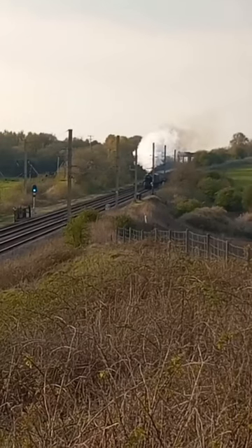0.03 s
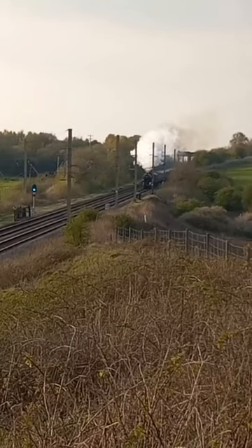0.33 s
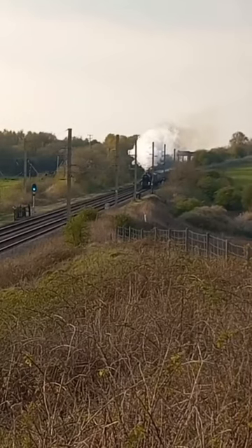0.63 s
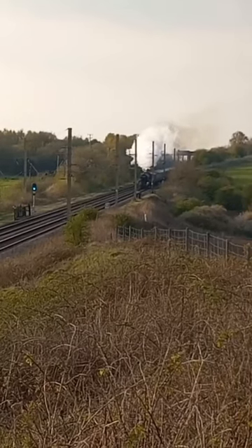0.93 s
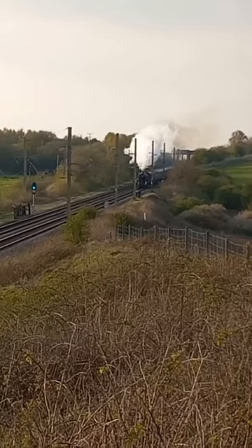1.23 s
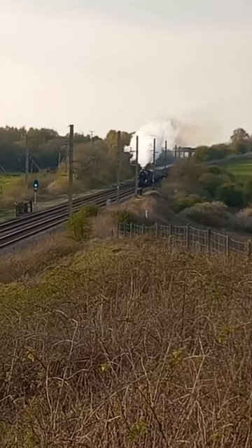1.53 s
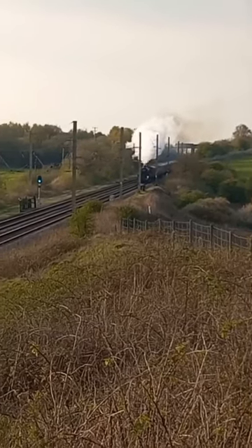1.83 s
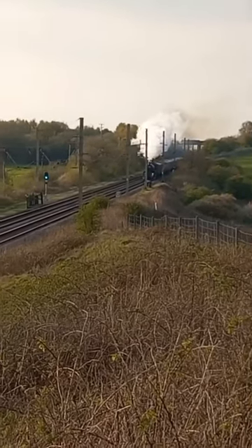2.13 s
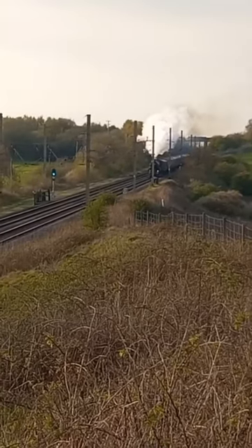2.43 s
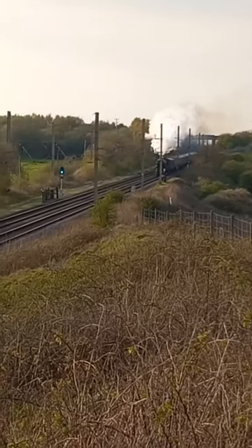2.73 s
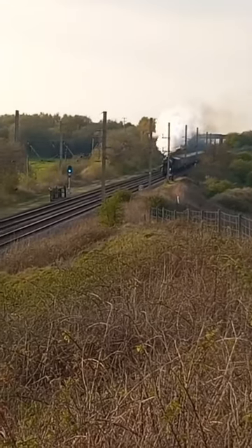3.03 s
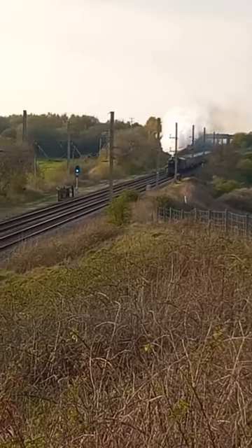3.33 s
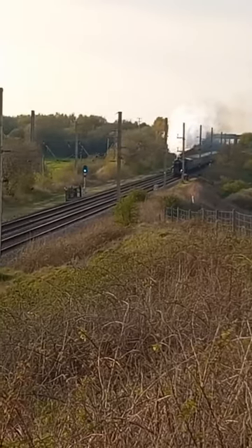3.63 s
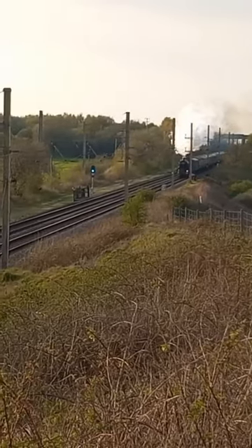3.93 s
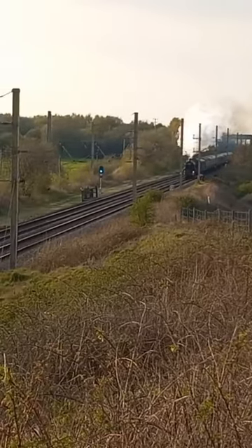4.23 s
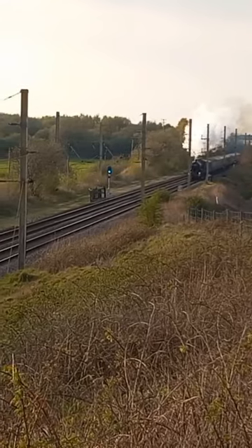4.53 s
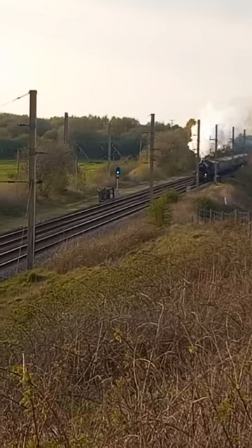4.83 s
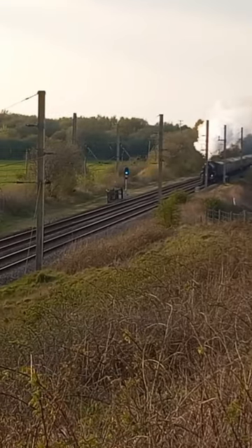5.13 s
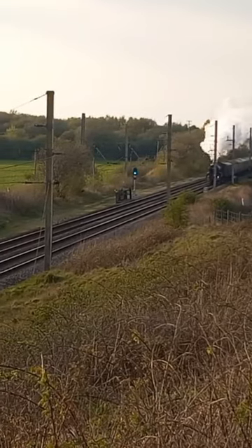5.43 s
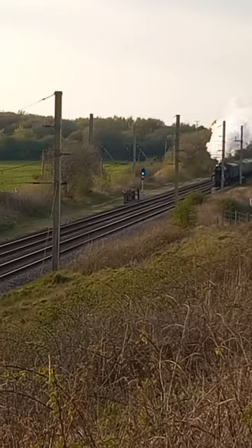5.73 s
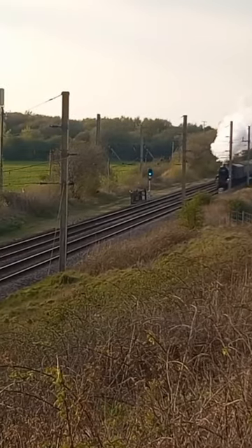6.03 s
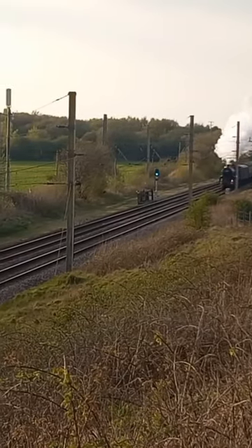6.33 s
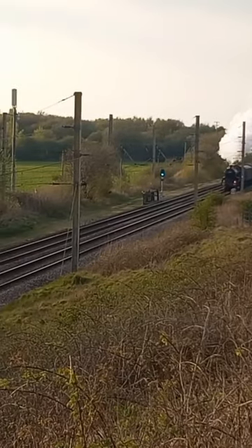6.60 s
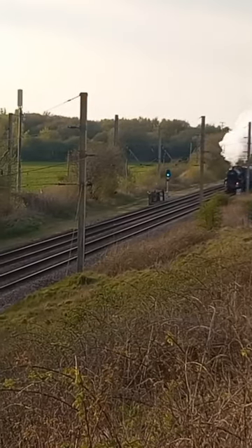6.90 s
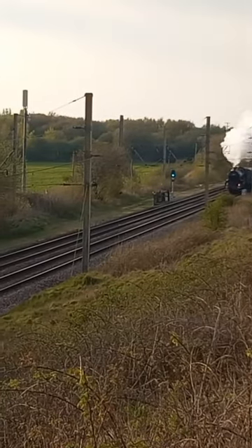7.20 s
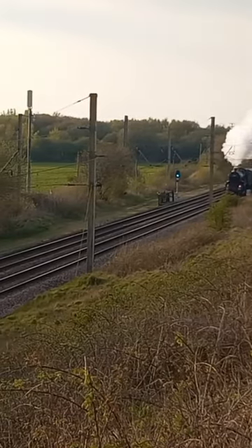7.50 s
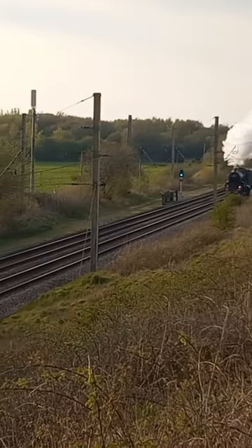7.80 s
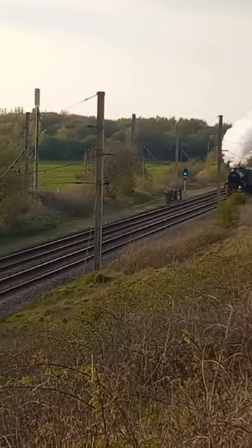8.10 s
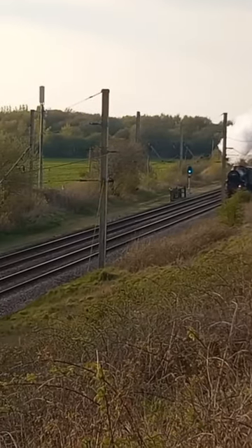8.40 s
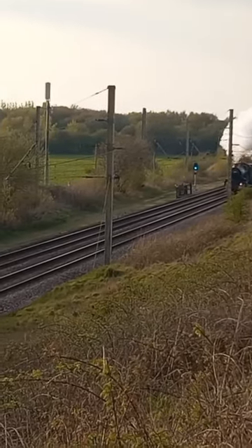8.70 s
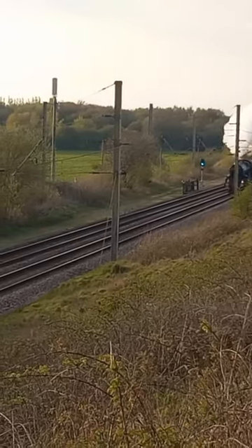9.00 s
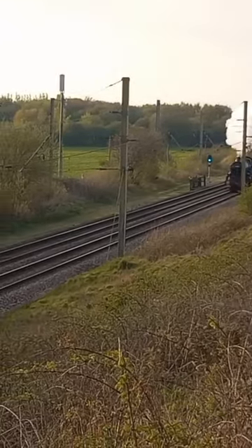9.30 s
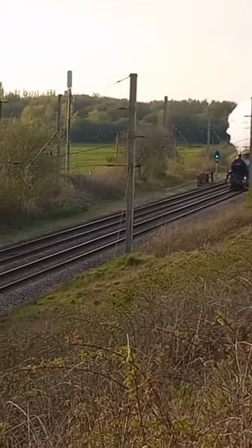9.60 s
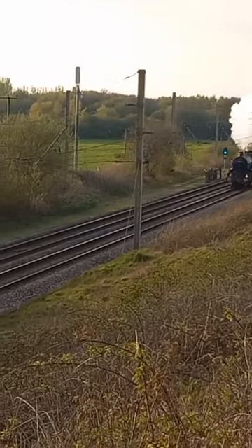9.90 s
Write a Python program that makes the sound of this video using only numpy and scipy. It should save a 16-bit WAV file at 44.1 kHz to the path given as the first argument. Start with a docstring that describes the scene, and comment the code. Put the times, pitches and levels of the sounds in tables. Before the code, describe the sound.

Outdoors in open country, rapid puffs of steam and a deep rumble come from a distant train and build gradually as it nears. Close by, small birds give short chirps and thin whistles, thinning out later, while soft gusts brush the microphone. Harder, hollow exhaust blasts and a wavering ring from the wheels come forward toward the end, with the train still approaching.

```python
"""Steam locomotive approaching across fields

A few hundred metres off, the exhaust pulses a turbulent jet four times per wheel turn and excites a hollow
drone; hard blasts bark, steam sings and rough rails set the wheels ringing. The roar grows as 1 / distance.
Close by, small birds whistle and chirp, a breeze rumbles on the microphone and something ticks twice."""
import sys
import numpy as np
from scipy import signal
from scipy.fft import rfft, irfft, next_fast_len
from scipy.io import wavfile
from scipy.ndimage import uniform_filter1d

SR = 44100
rng = np.random.default_rng(int(sys.argv[2]) if len(sys.argv) > 2 else 0)


def waveform_to_disk(signal):
    """Save audio, clipped to [-1, 1], as 16-bit WAV at the path in sys.argv[1]."""
    frames = np.transpose(np.atleast_2d(signal))
    scaled = np.clip(frames, -1, 1) * 32767
    samples = np.round(scaled).astype(np.int16)
    wavfile.write(sys.argv[1], SR, samples)


N = 438794
TIME = np.arange(N) / SR
SIZE = next_fast_len(N, True)
HZ = np.maximum(np.arange(SIZE // 2 + 1) * SR / SIZE, 1)


def from_db(db):
    """Amplitude ratio of a level."""
    return 10 ** (np.asarray(db) / 20)


def rms_one(x):
    """Normalisation to unit rms."""
    return x / np.sqrt(np.mean(x ** 2) + 1e-20)


def in_time(rows):
    """Linear interpolation of each column over time."""
    s, *columns = np.transpose(rows)
    return [np.interp(TIME, s, c) for c in columns]


def at_hz(points):
    """Interpolation over log frequency."""
    hz, value = np.transpose(points)
    return np.interp(np.log(HZ), np.log(hz), value)


def white():
    """Gaussian spectrum of white noise."""
    return rng.standard_normal(2 * len(HZ)).view(complex)


def white_pair():
    """Two incoherent white spectra."""
    return np.array([white(), white()])


def wave(spectrum):
    """Inverse Fourier transform."""
    return irfft(spectrum, SIZE)[..., :N]


def drift(rate):
    """Low-pass random fluctuation of unit rms."""
    smooth = signal.butter(2, .6 * rate, fs=SR, output="sos")
    return rms_one(signal.sosfilt(smooth, rng.standard_normal(N)))


def even(noise, window_s):
    """Division by the running rms flattens the envelope."""
    power = uniform_filter1d(np.mean(noise ** 2, axis=0), max(int(window_s * SR), 1))
    return noise / np.sqrt(np.maximum(power, 0) + 1e-20)


def resonance(hz, width_hz):
    """Magnitude response of a steep-sided resonance."""
    return 1 / (1 + ((HZ - hz) / (.75 * width_hz)) ** 2) ** 1.5


# The train's sound at the two microphone ports: f/Hz, coherence
PORT_COHERENCE = [(60, 0.99), (130, 0.96), (250, 0.99), (620, 0.93), (900, 0.76), (1500, 0.88),
                  (2500, 0.79), (2850, 0.53), (3450, 0.83), (4000, 0.54), (4430, 0.4), (4700, 0.61),
                  (5400, 0.45), (8000, 0.2)]
# Left level minus right: f/Hz, level/dB
PORT_BALANCE = [(100, 0), (490, -0.5), (830, 1.5), (1500, 0), (2300, 0), (2750, 0), (3200, 0.5), (3800, -2),
                (4600, -3), (5300, -1.3), (7000, -2)]
# Lag of the left port: f/Hz, phase/rad
PORT_LAG = [(20, 0.5), (620, 0.05), (1000, 0.69), (1750, 1.28), (2250, 1.29), (2650, 0.9), (2880, 2.44),
            (3600, 2.77), (3950, 3.52), (4300, 4.74), (4600, 1.9), (4900, 3.5), (5080, 1.5), (5430, 3.1),
            (6000, 4.8), (8000, 4)]
# Reflection off the listener's body: f/Hz, left amplitude ratio, right amplitude ratio
BODY_REFLECTION = [(200, 0.027, 0.026), (614, 0.092, .05), (950, 0.098, 0.076), (1400, 0.29, 0.065),
                   (2270, .42, .05), (3000, .08, .04), (4400, .08, .04), (7000, .05, .05)]


def from_track():
    """Interference: a close reflection combs noise arriving from the right, within a diffuse field."""
    coherence = np.clip(at_hz(PORT_COHERENCE), 0, 1)
    direct = white() * np.exp(-1j * at_hz(PORT_LAG) * [[1], [0]])
    for side, delay_s in enumerate((0.001903, 0.001979)):
        strength = at_hz([(row[0], row[1 + side]) for row in BODY_REFLECTION])
        direct[side] *= 1 + strength * np.exp(-2j * np.pi * HZ * delay_s)
    ports = np.sqrt(coherence) * direct + np.sqrt(1 - coherence) * white_pair()
    return ports * from_db(at_hz(PORT_BALANCE) * [[.5], [-.5]])


# The four blasts of a wheel turn: position/turn, accent/dB
TURN_BLASTS = [(0, 4), (.252, 2), (0.496, -0.5), (0.743, 0.5)]
# Force of the exhaust: t/s, relative level/dB
ENGINE_EFFORT = [(0, 1.5), (.8, 2), (1.6, 0.5), (2.6, 2), (3.6, 0.5), (4.6, 0.5), (5.6, -1.5), (7.1, -2),
                 (7.6, -2.5), (9.95, 1.5)]


def exhaust_beats(first_s=.0485, turn_s=.27869, shortening_s=.000432, scatter_db=0.45):
    """An energy impulse train: four uneven blasts per turn, quickening as the wheels gather speed."""
    place, accent_db = np.transpose(TURN_BLASTS)
    turns = np.arange(int(N / SR / turn_s) + 4)[:, None] + place
    at = np.round((first_s + turn_s * turns - shortening_s * turns ** 2 / 2) * SR).astype(int)
    energy = from_db(accent_db + scatter_db * rng.standard_normal(at.shape)) ** 2
    beats = np.zeros(N)
    beats[at[at < N]] = energy[at < N]
    effort_db, = in_time(ENGINE_EFFORT)
    extra_db = sum(db * (np.abs(TIME - s) < turn_s / 8) for s, db, *_ in BARKING_BLASTS)
    return beats * from_db(effort_db + extra_db) ** 2


def pulse(age, rise_s, fall_s):
    """A smooth onset with exponential decay."""
    return (1 - np.exp(-(age / rise_s) ** 2)) * np.exp(-age / fall_s)


def puffing(beats, rise_s, fall_s, steady, scatter_db=0.87):
    """Incoherent powers add: an envelope of blasts over a steady share of rolling noise and echo."""
    blast = pulse(TIME[:SR // 3], rise_s, fall_s)
    power = np.zeros(N + len(blast))
    for at in np.flatnonzero(beats):
        power[at:at + len(blast)] += beats[at] * from_db(scatter_db * rng.standard_normal()) ** 2 * blast
    return np.sqrt(steady + (1 - steady) * power[:N] / power[:N].mean())


# Peaks and dips common to all blasts: f/Hz, width/Hz, far gain/dB, near gain/dB
EXHAUST_FORMANTS = [(772, 20, 7, 6), (845, 50, -0.5, -4), (1272, 53, -2.5, -4.5), (1560, 200, 1.5, 1),
                    (1776, 110, -4, -4), (2050, 170, 4.5, 3), (2240, 120, 2, 4), (2360, 80, -3.5, -5.5),
                    (2450, 130, 5, 6), (2675, 160, 8.5, 8.5), (2870, 70, -2, 0.5), (3160, 170, 4.5, 3),
                    (3390, 130, 2.5, 2), (3760, 190, 2, 1.5), (4420, 220, 1.5, 4), (4600, 180, 1.5, 2),
                    (4820, 110, 1, 2), (5170, 180, 2, 3)]


def hollowed(noise, nearness, slide=0.0095, waver_db=2.05, wander_hz=1.5):
    """Formant filtering: each resonance wanders in frequency and gain as the air moves."""
    hz, s, frames = signal.stft(noise, SR, nperseg=1024)
    near, gain_db = np.interp(s, TIME, nearness), 0
    smooth = signal.butter(2, wander_hz, fs=1 / s[1], output="sos")
    for centre, width, far_db, near_db in EXHAUST_FORMANTS:
        wander = signal.sosfilt(smooth, rng.standard_normal((2, 2 * len(s))))
        sliding, swelling = map(rms_one, wander[:, len(s):])
        boost_db = far_db + (near_db - far_db) * near + waver_db * swelling
        detuning_hz = hz[:, None] - centre * (1 + slide * sliding)
        gain_db = gain_db + boost_db / (1 + (2 * detuning_hz / width) ** 2)
    return signal.istft(frames * from_db(gain_db), SR)[1][:, :N]


# Spectrum of the roar, far off and nearer: f/Hz, relative level/dB
FAR_SPECTRUM = [(45, -16), (80, -9.5), (180, -6), (230, 2), (350, -2.5), (540, 0), (700, -7), (900, -8.5),
                (1150, -6.5), (1500, -8), (1800, -13.5), (2100, -17.5), (2750, -20.5), (3200, -18.5),
                (3700, -18), (3950, -24.5), (4650, -19.5), (5200, -26.5), (6000, -32), (7600, -61),
                (10000, -82.5)]
NEAR_SPECTRUM = [(45, -16.5), (70, -6.5), (170, -8.5), (210, -0.5), (350, -3), (460, -2), (650, -2),
                 (880, -14), (1500, -14.5), (2100, -16.5), (2700, -19), (3400, -14), (3700, -16.5),
                 (3980, -16.5), (4650, -20), (5300, -23.5), (6000, -29.5), (7400, -41.5), (10000, -78.5)]
# Three treble bands as wind and ground carry them, referred to the starting distance: t/s, level/dB
MID_BAND = [(0, -46.5), (1.7, -42.5), (2.8, -44), (4, -44.5), (5, -44.5), (5.6, -43), (7.1, -36.5),
            (8.1, -42.5), (9.95, -45)]
UPPER_BAND = [(0, -45), (1.8, -45.5), (2.48, -44), (2.55, -40.5), (3.3, -41.5), (4.25, -41.5),
              (4.851, -41.5), (5.05, -45), (5.7, -48.5), (6.9, -42.5), (7.6, -44), (8.6, -43), (9.2, -44.5),
              (9.95, -48)]
SIZZLE_BAND = [(0, -57.5), (.85, -54.5), (1.55, -50), (2.2, -51.5), (3.2, -53), (4.4, -48), (5.3, -52),
               (6.2, -50.5), (6.85, -52), (7.2, -48.5), (8, -51.5), (8.7, -49), (9.2, -49.5), (9.95, -50.5)]


def roar(beats, start_m=313, speed_m_per_s=21.06, body_db=-34.5, edges_hz=(800, 1900, 3300)):
    """Spherical spreading: the turbulent chimney jet and rolling noise grow as 1 / distance."""
    mid_db, upper_db, sizzle_db = (in_time(band)[0] for band in (MID_BAND, UPPER_BAND, SIZZLE_BAND))
    distance_m = start_m - speed_m_per_s * TIME
    nearness = np.interp(TIME, [4.8, 8.5], [0, 1])
    jet = rfft(hollowed(wave(from_track()), nearness), SIZE)
    far, near = jet * from_db(at_hz(FAR_SPECTRUM)), jet * from_db(at_hz(NEAR_SPECTRUM))
    # a blast opens with a thud; its sizzle lingers and depends less on its force
    body = from_db(body_db) * puffing(beats, rise_s=0.0048, fall_s=0.022, steady=0.56)
    mid = from_db(mid_db) * puffing(beats, rise_s=0.0078, fall_s=0.031, steady=0.051)
    upper = from_db(upper_db) * puffing(beats, rise_s=0.0105, fall_s=0.017, steady=0.3)
    sizzle = from_db(sizzle_db) * puffing(beats ** 0.92, rise_s=0.0046, fall_s=0.04, steady=0.056)
    low_passes = [1 / (1 + (HZ / edge) ** 16) for edge in edges_hz]
    bands = np.diff(low_passes, axis=0, prepend=0, append=1)
    out = 0
    for level, band in zip((body, mid, upper, sizzle), bands):
        noise = (1 - nearness) * rms_one(wave(far * band)) + nearness * rms_one(wave(near * band))
        out = out + level * noise
    turbulence_db = 0.47 * drift(68)
    return out * from_db(turbulence_db) * start_m / distance_m


# The low drone's uneven level, with quick irregular dips and surges: t/s, relative level/dB
DRONE_LEVEL = [(0.0, -45), (0.05, -39.5), (1.08, -35.5), (1.16, -60), (1.22, -33.5), (1.47, -31),
               (1.55, -39.5), (1.69, -32), (1.77, -45), (1.83, -28), (1.91, -44), (1.97, -33), (2.3, -35.5),
               (2.35, -25.5), (2.44, -41), (3.13, -35.5), (3.16, -48), (3.24, -30.5), (4.71, -37),
               (4.74, -30.5), (5.04, -31), (5.07, -22), (5.51, -46), (5.76, -30), (6.04, -41), (6.1, -33.5),
               (6.54, -29.5), (6.65, -23), (6.73, -31.5), (7.51, -26), (7.57, -37), (7.67, -29.5),
               (8.15, -38), (8.23, -29.5), (9.81, -33), (9.95, -49)]
# Its resonances: f/Hz, width/Hz, relative level/dB
SMOKEBOX_MODES = [(256, 18, -0.5), (277, 30, -14)]


def drone(beats, gain_db=-0.5):
    """Forced resonance: blasts keep smokebox and chimney ringing, over a slowly growing undertone."""
    level_db, = in_time(DRONE_LEVEL)
    colour = sum(from_db(db) * resonance(hz, width) for hz, width, db in SMOKEBOX_MODES)
    source = from_track()
    main = from_db(level_db + gain_db) * even(wave(source * colour), window_s=0.12)
    under_db = -48.5 + TIME  # grows 1 dB/s
    under = from_db(under_db) * even(wave(source * resonance(hz=215, width_hz=15)), window_s=.25)
    return (main + under) * puffing(beats, rise_s=0.013, fall_s=0.063, steady=0.77)


def ringing(hz, width_hz, shared):
    """Narrow-band stereo noise: random modulation of a gliding carrier sets the bandwidth."""
    kicks = rng.standard_normal((3, 2 * N)).view(complex)
    wander = signal.sosfilt(signal.butter(2, width_hz / 2, fs=SR, output="sos"), kicks)
    ports = np.sqrt(shared) * wander[0] + np.sqrt(1 - shared) * wander[1:]
    ports[0] *= np.exp(-1j * np.interp(hz, HZ, at_hz(PORT_LAG)))
    return rms_one(np.real(ports * np.exp(2j * np.pi * np.cumsum(hz) / SR)))


# The low note of the rolling wheels: t/s, f/Hz, level/dB
WHEEL_NOTE = [(0, 583, -45.5), (3, 559.6, -42), (4.3, 598.5, -42), (5, 620.6, -38.5), (5.6, 597.8, -39.5),
              (7.4, 627.2, -33.5), (8.3, 602.5, -33), (9.1, 631.3, -33.5), (9.95, 627, -33)]


def wheels():
    """Roughness excitation: the rails ring the wheels in a broad, sliding note."""
    hz, db = in_time(WHEEL_NOTE)
    return from_db(db) * even(ringing(hz, width_hz=43, shared=0.99), window_s=0.13)


# A hollow band in the roar: t/s, f/Hz, level/dB
HOLLOW_BAND = [(0, 1136, -45), (3, 1102, -52.5), (5.5, 1061, -56), (7.2, 986, -45), (7.9, 1007, -38),
               (8.5, 1034, -37), (9.2, 1100, -37.5), (9.95, 1122, -41.5)]


def hollow_band():
    """Narrow-band noise near 1 kHz, heard as a sliding, hollow colour in the roar."""
    hz, db = in_time(HOLLOW_BAND)
    return from_db(db) * even(ringing(hz, width_hz=100, shared=0.97), window_s=0.08)


# The thin note of the steam: t/s, f/Hz, level/dB
STEAM_NOTE = [(0, 4620, -68.5), (3.9, 4593, -62), (4.2, 4660, -50), (4.55, 4660, -43.5), (4.85, 4630, -54),
              (5.15, 4640, -56.5), (6.9, 4465, -60), (7.2, 4450, -49), (7.6, 4420, -53), (8.1, 4520, -58.5),
              (8.75, 4600, -46), (9.3, 4610, -57), (9.95, 4700, -52)]


def steam_ring(beats):
    """Amplitude modulation: steam sings in a narrow high band with each blast."""
    hz, db = in_time(STEAM_NOTE)
    band = from_db(db) * ringing(hz, width_hz=240, shared=1.0)
    balance = from_db([[-1.5], [1.5]])
    return band * balance * puffing(beats, rise_s=.009, fall_s=0.026, steady=0.11)


# Course of the faint hiss: t/s, relative level/dB
HISS_LEVEL = [(0, -72), (8, -72), (8.7, -70), (9.95, -67.5)]
# Its spectrum: f/Hz, relative level/dB
HISS_SPECTRUM = [(6000, 2), (8400, -11), (9400, -12.5), (11000, -11.5), (13000, -7.5), (15000, -4.5),
                 (16000, -15)]


def high_hiss(gain_db=-5):
    """Incoherent noise in the top octaves, heard as a faint, wide hiss."""
    level_db, = in_time(HISS_LEVEL)
    colour = from_db(at_hz(HISS_SPECTRUM)) * (HZ > HISS_SPECTRUM[0][0])
    return from_db(level_db + gain_db) * rms_one(wave(white_pair() * colour))


# Gusts: t/s, duration/s, relative level/dB
BREEZE_GUSTS = [(.08, 0.26, -30.5), (.46, 0.1, -30.5), (1.16, 0.14, -32.5), (2.33, 0.17, -36),
                (3.47, 0.078, -38), (3.8, 0.13, -35), (4.07, 0.084, -30.5), (5.57, 0.12, -33.5),
                (6.6, .2, -39), (7.7, 0.19, -34)]
# Spectrum of the eddies: f/Hz, relative level/dB
EDDY_SPECTRUM = [(15, -22.5), (35, -12), (60, -1), (90, 4.5), (150, -1), (210, -3), (400, -49.5),
                 (2000, -100)]


def breeze(base_db=-43.5, waver_db=4, shared=0.16):
    """Turbulent pressure: eddies, mostly each port's own, rumble in gusts above a wavering base."""
    base = from_db(base_db + waver_db * drift(11))
    gust_power = sum(from_db(db) ** 2 * np.exp(-(2 * (TIME - s) / length) ** 2)
                     for s, length, db in BREEZE_GUSTS)
    eddies = np.sqrt(shared) * white() + np.sqrt(1 - shared) * white_pair()
    rumble = even(wave(eddies * from_db(at_hz(EDDY_SPECTRUM))), window_s=0.18)
    balance = from_db([[.1], [-2.2]])
    return np.sqrt(base ** 2 + gust_power) * balance * rumble


def bird_note(s, length_s, glide_hz, db, flutter):
    """Frequency modulation: flutter roughens a gliding sine that swells and fades."""
    out, progress = np.zeros(N), np.linspace(0, 1, int(length_s * SR))
    span = slice(int(s * SR), int(s * SR) + len(progress))
    glide = np.polyfit(np.linspace(0, 1, len(glide_hz)), glide_hz, len(glide_hz) - 1)
    hz = np.polyval(glide, progress) * (1 + flutter[span])
    envelope = np.sqrt(2 * np.abs(np.sin(np.pi * progress)))
    out[span] = from_db(db) * envelope * np.sin(2 * np.pi * np.cumsum(hz) / SR)
    return out


def in_bushes(song, echo_db, t60_s=.38, left_lag_s=.00004, left_db=4.0):
    """Scattering: bushes and trees add an exponentially decaying tail to the direct song."""
    age = TIME[:SR // 4]
    scatter = rng.standard_normal((2, len(age))) * from_db(-60 * age / t60_s)
    scatter /= np.sqrt(np.sum(scatter ** 2, axis=1, keepdims=True))
    direct = np.array([from_db(left_db) * np.interp(TIME - left_lag_s, TIME, song), song])
    return direct + from_db(echo_db) * signal.fftconvolve(song[None], scatter)[:, :N]


# Short chips, clear or raspy: t/s, start f/Hz, end f/Hz, level/dB, relative roughness
BIRD_CHIPS = [(.205, 5100, 4850, -62, .5), (.468, 4790, 4650, -50.5, 1.1), (.548, 4100, 4760, -54, 1.1),
              (1.781, 4360, 5000, -47, 0.9), (1.86, 4300, 4850, -50, .9), (2.39, 5350, 4650, -50, .4),
              (2.903, 4550, 4830, -49.5, 0.74), (3.468, 4500, 4320, -47.5, 0.3),
              (4.634, 5480, 4400, -48, .7), (5.9, 4650, 5250, -47, 0.7), (6.488, 5360, 4330, -46.5, .5)]
# Whistled notes: t/s, duration/s, start f/Hz, middle f/Hz, end f/Hz, level/dB
BIRD_WHISTLES = [(1.473, 0.1, 3750, 3705, 3660, -50), (1.61, 0.083, 3720, 3730, 3720, -52),
                 (1.686, .075, 3790, 3720, 3710, -45.5), (1.778, 0.21, 3700, 3664, 3760, -57),
                 (2.065, 0.37, 7560, 7290, 7450, -71), (2.168, 0.15, 6200, 6180, 6200, -55),
                 (2.318, 0.11, 6270, 6310, 6300, -61), (2.489, 0.025, 5200, 5370, 5440, -48),
                 (2.529, 0.036, 5380, 5420, 5360, -47), (2.566, .09, 6300, 6220, 6160, -45),
                 (2.636, 0.2, 5220, 5190, 5020, -53), (2.79, 0.085, 5620, 5730, 5720, -57),
                 (7.328, 0.08, 6260, 6060, 6340, -58)]


def birds(rasp=0.055, whistle_rough=0.07, chip_s=.037):
    """Direct-to-reverberant ratio: whistles come from deep in the bushes, chips are closer and drier."""
    flutter = rasp * drift(410)
    chips = sum(bird_note(s, chip_s, glide_hz, db, rough * flutter)
                for s, *glide_hz, db, rough in BIRD_CHIPS)
    whistles = sum(bird_note(s, length, glide_hz, db, whistle_rough * flutter)
                   for s, length, *glide_hz, db in BIRD_WHISTLES)
    tremolo = from_db(2.1 * drift(50))
    return in_bushes(whistles * tremolo, echo_db=-2.0) + in_bushes(chips, echo_db=-7)


# Two small ticks: t/s, level/dB
TICK_EVENTS = [(2.028, -34), (6.454, -42)]
# Their spectrum: f/Hz, relative level/dB
TICK_SPECTRUM = [(3000, -32), (6000, -8), (9000, -19), (12200, 3.5), (14000, -10), (16000, -24)]


def ticks(fall_s=0.00075, hiss_db=-31, hiss_s=.04):
    """Exponential transients: two short bright ticks, with a faint brief hiss added after each."""
    level = np.zeros(N)
    for s, db in TICK_EVENTS:
        at = int(s * SR)
        age = TIME[:N - at]
        level[at:] += from_db(db) * (np.exp(-age / fall_s) + from_db(hiss_db) * np.exp(-age / hiss_s))
    return level * even(wave(white_pair() * from_db(at_hz(TICK_SPECTRUM))), window_s=.001)


# Hard blasts: t/s, accent on the exhaust beat/dB, chimney note f/Hz, relative note level/dB
BARKING_BLASTS = [(2.54, .3, 520, -36), (2.815, 0, 520, -30), (3.15, 1.5, 520, -36), (3.91, 1.3, 500, -36),
                  (4.105, 0, 500, -30.5), (4.185, 1.3, 540, -36), (4.25, 1.5, 560, -37),
                  (4.73, 1.6, 520, -33), (4.995, 0, 620, -30), (5.925, 1.7, 600, -31), (6.07, .3, 580, -31),
                  (6.41, 1.8, 600, -33), (6.615, 1.5, 620, -29), (6.82, .5, 590, -28),
                  (7.148, 2.3, 630, -28), (7.424, 1, 625, -25), (7.68, 2.3, 620, -36), (8.21, 0, 600, -30),
                  (8.55, 1.2, 600, -33), (8.745, .8, 600, -25), (9.015, -.8, 470, -27), (9.54, 0, 600, -24),
                  (9.725, 1.2, 620, -26)]


def barks(gain_db=1.0):
    """Damped resonance: a hard blast rings the chimney briefly on a hollow note."""
    hz, level = np.full(N, float(BARKING_BLASTS[0][2])), np.zeros(N)
    shape = pulse(TIME[:SR // 6], rise_s=.009, fall_s=0.014)
    for s, _, note_hz, db in BARKING_BLASTS:
        at = int(s * SR)
        hz[at:] = note_hz
        level[at:at + len(shape)] += from_db(db + gain_db) * (shape / shape.max())[:N - at]
    return level * even(ringing(hz, width_hz=110, shared=0.95), window_s=.02)


def scene():
    """Superposition of the distant train and the small sounds around the listener."""
    beats = exhaust_beats()
    train = roar(beats) + drone(beats)
    train += (wheels() + hollow_band()) * puffing(beats, rise_s=0.0032, fall_s=0.02, steady=0.29)
    train += steam_ring(beats) + barks()
    nearby = birds() + ticks() + breeze()
    return train + nearby + high_hiss()


def record(dry, low_hz=42, high_hz=15500, fade_s=.004):
    """Band limiting: the microphone sheds the deepest rumble and the top is cut steeply."""
    faded = dry * np.minimum(np.minimum(TIME, TIME[::-1]) / fade_s, 1)
    thinned = signal.sosfilt(signal.butter(2, low_hz, "high", fs=SR, output="sos"), faded)
    return signal.sosfilt(signal.ellip(10, .1, 80, high_hz, fs=SR, output="sos"), thinned)


dry = scene()
out = record(dry)
waveform_to_disk(out)
```